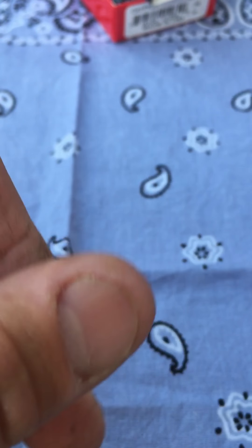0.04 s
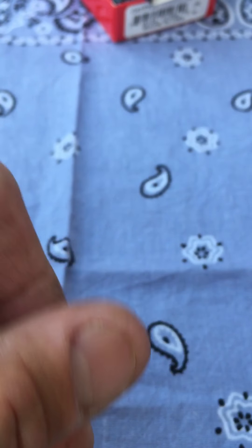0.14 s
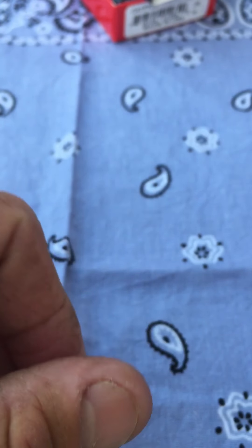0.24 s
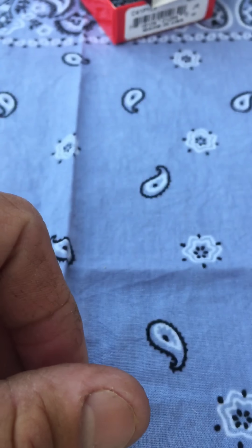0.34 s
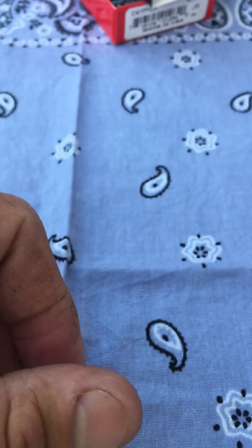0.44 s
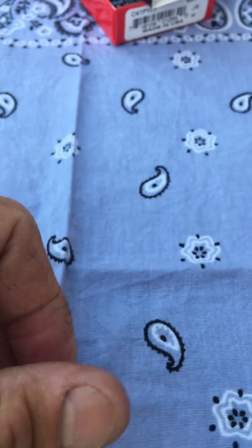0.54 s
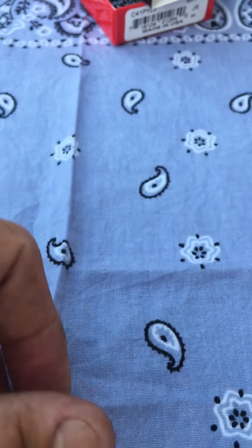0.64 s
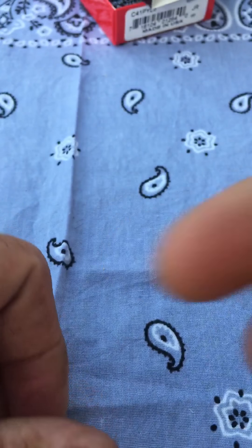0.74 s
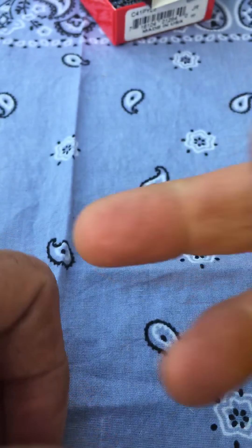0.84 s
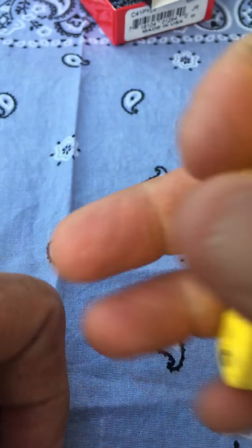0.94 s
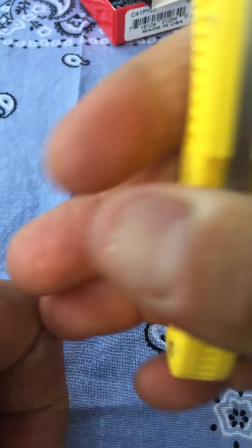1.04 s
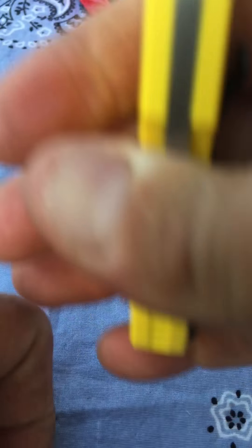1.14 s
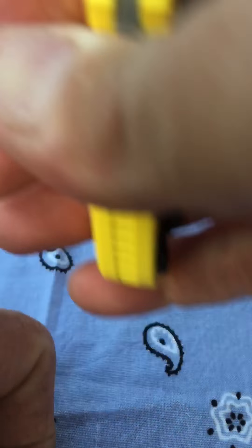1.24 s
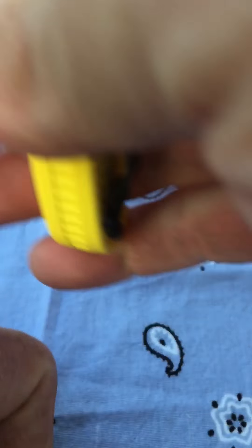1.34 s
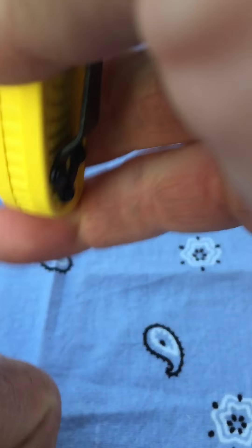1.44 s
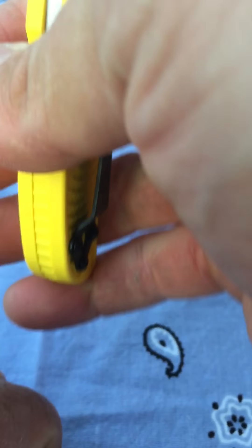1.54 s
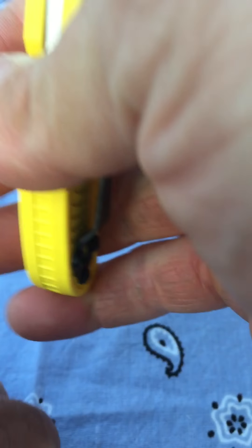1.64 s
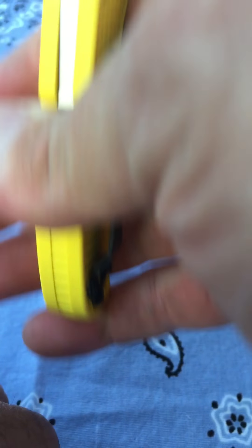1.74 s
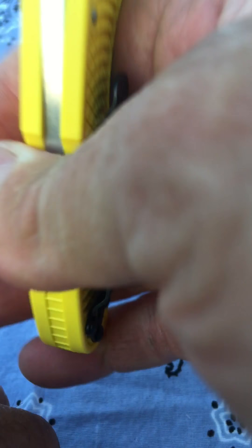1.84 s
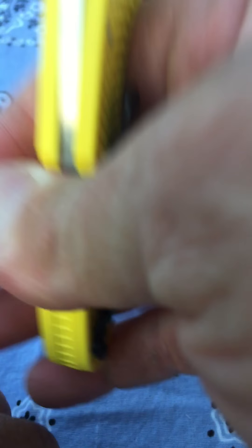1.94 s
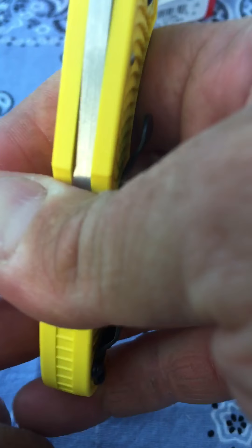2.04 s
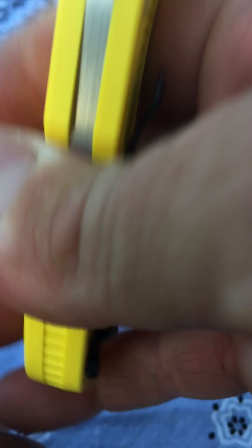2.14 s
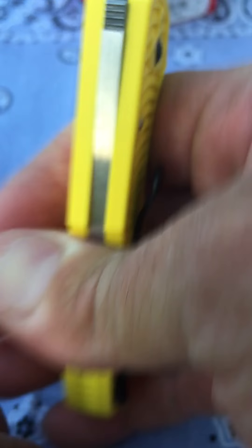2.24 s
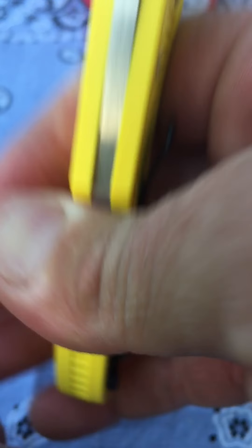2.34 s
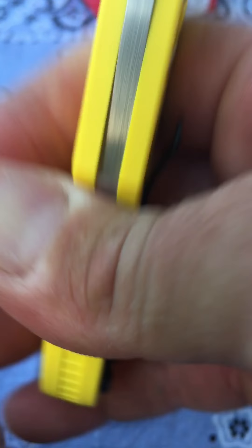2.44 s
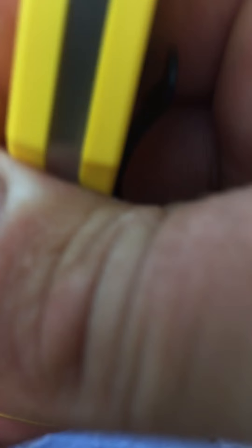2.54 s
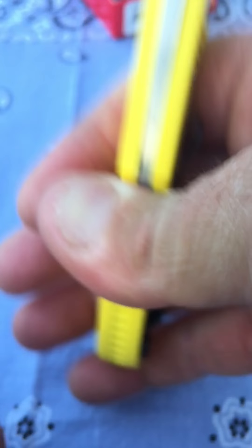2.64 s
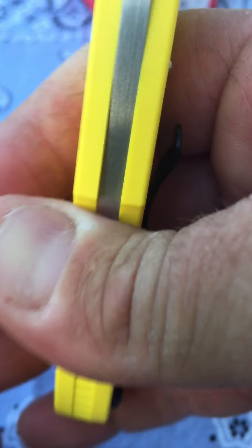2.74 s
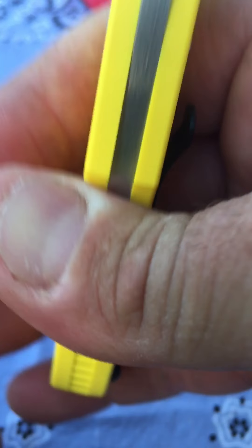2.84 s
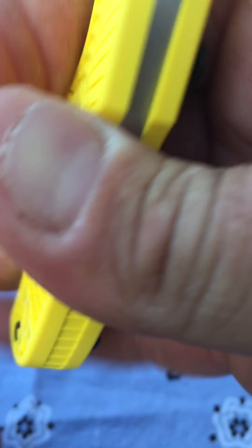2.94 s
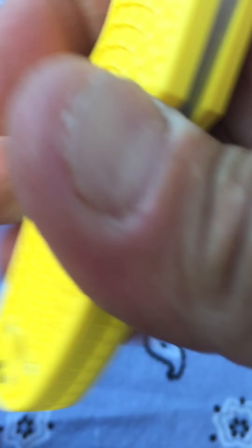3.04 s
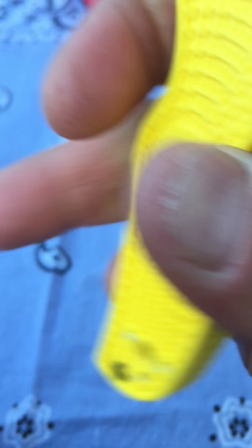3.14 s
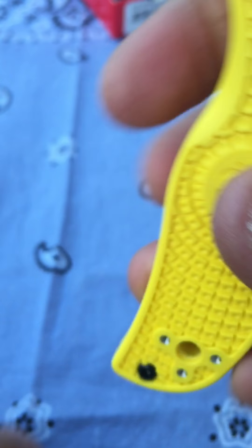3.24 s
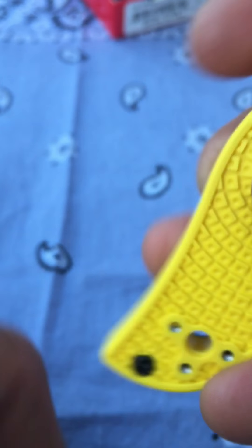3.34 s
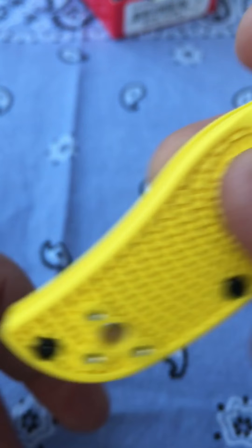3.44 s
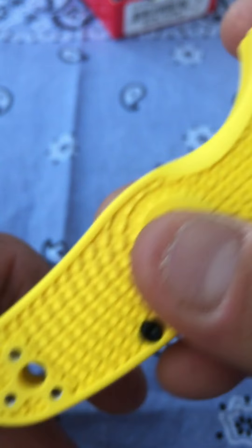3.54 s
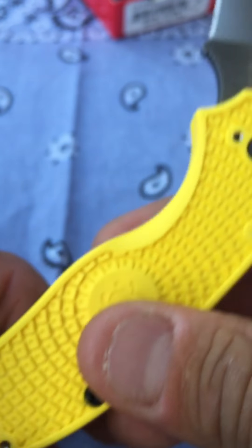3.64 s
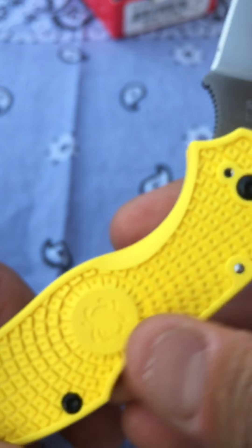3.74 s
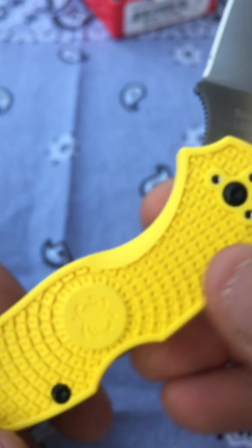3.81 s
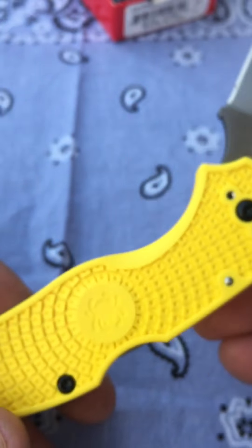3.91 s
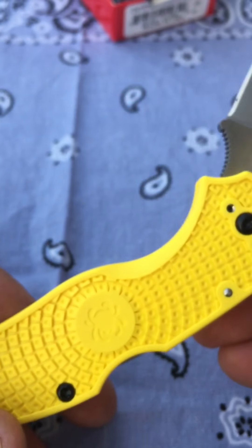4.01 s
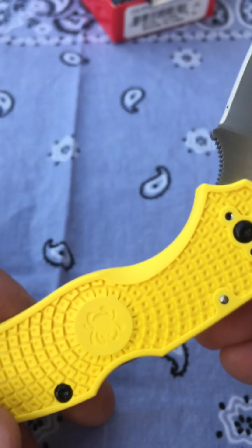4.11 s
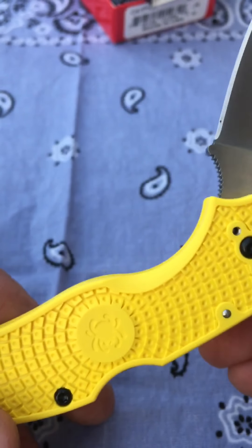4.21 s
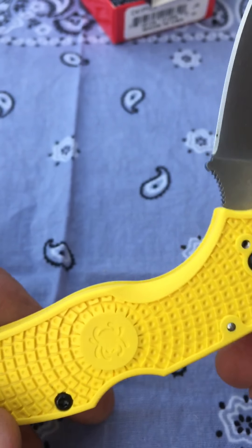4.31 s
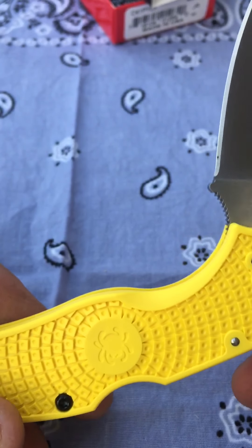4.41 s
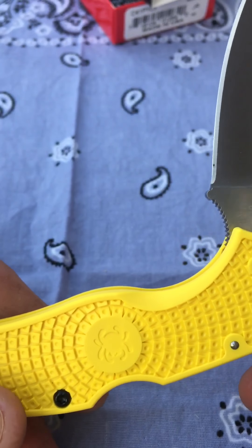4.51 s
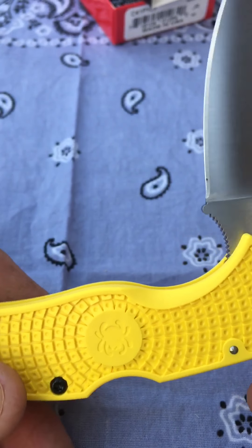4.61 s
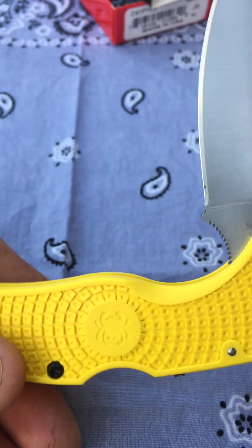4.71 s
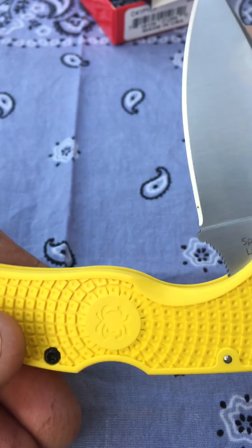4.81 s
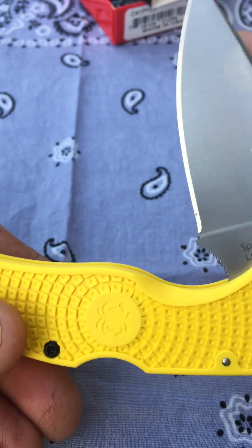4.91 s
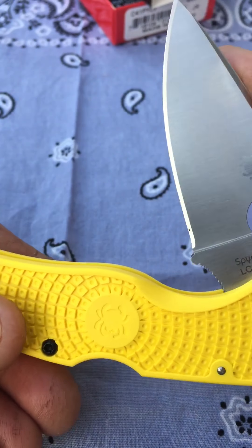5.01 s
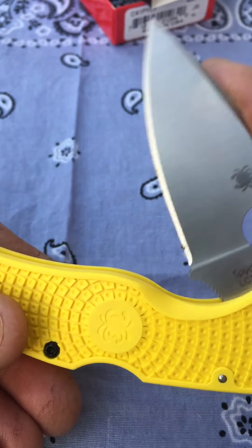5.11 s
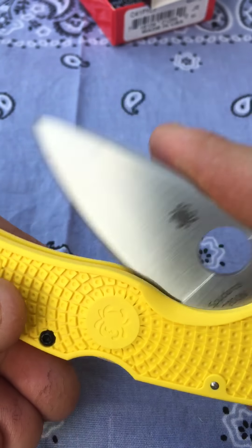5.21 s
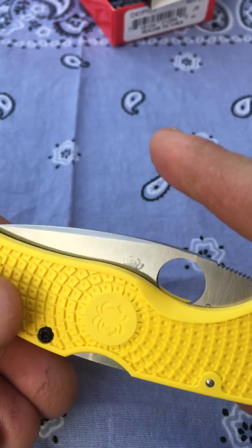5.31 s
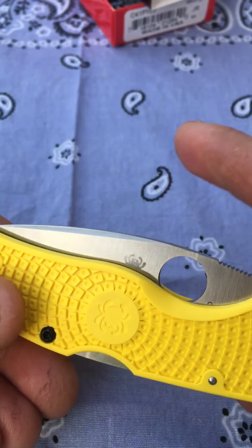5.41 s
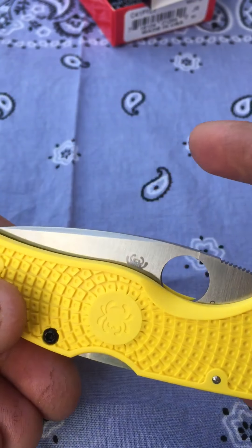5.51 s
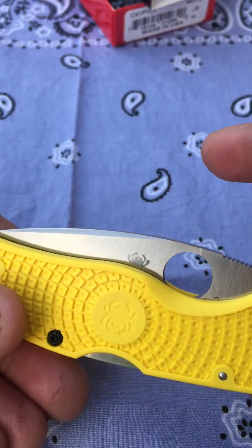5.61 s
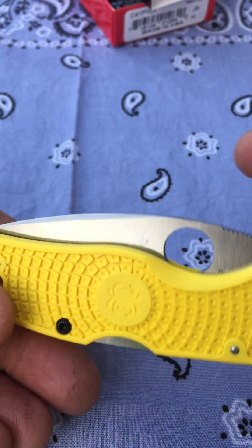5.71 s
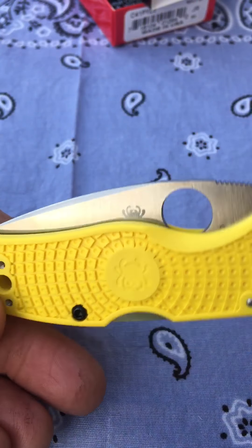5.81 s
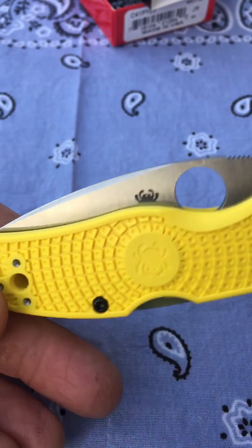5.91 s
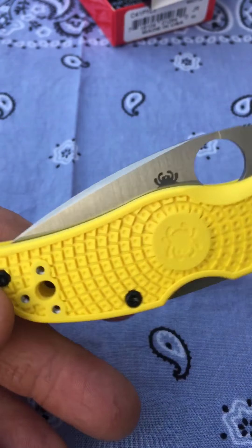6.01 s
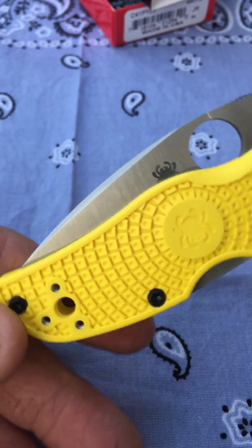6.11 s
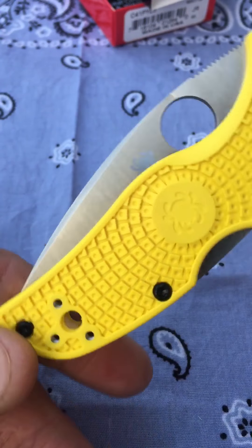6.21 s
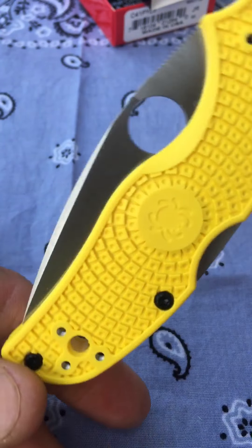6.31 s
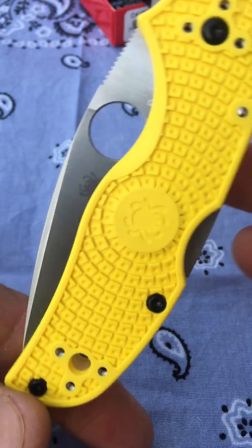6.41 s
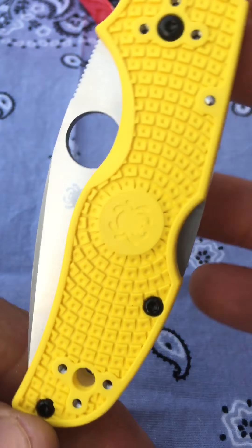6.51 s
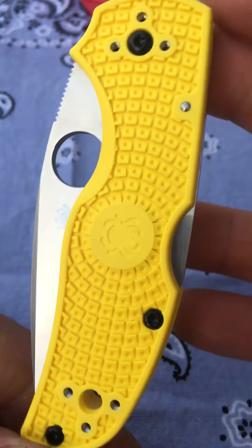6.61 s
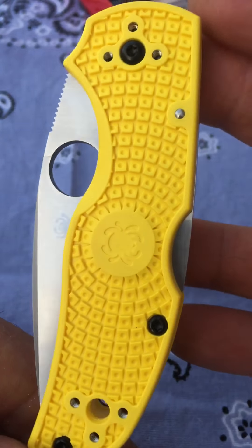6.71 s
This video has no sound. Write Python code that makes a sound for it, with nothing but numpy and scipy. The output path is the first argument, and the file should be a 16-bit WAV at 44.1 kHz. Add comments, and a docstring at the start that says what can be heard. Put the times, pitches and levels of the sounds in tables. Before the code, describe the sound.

Close, dry clicks and skin rubbing on textured plastic lead to one loud, distorted metallic snap of a folding blade, with low road rumble behind.

```python
"""Distant traffic rumbles outside a small room; a plastic-handled folding knife is soon turned over in
the hand, close to the microphone. Fingers rub and scrape its textured grip, it ticks lightly, the lock
gives with a dull bump, and the blade snaps shut, hard enough to overload the input.
Traffic is shaped noise, an engine and a hum are wavering tones; friction is noise with tiny slips,
squeaks are hoarse tones, and contacts ring decaying modes with a short noisy crack."""
import sys
import numpy as np
from scipy import signal
from scipy.fft import rfft, irfft, next_fast_len
from scipy.io import wavfile
from scipy.ndimage import uniform_filter1d, map_coordinates

SR = 44100
rng = np.random.default_rng(int(sys.argv[2]) if len(sys.argv) > 2 else 0)


def master_out(mix):
    """Clip the mix to full scale and print it as 16-bit PCM to the path in sys.argv[1]."""
    frames = np.transpose(np.atleast_2d(mix))
    ceiling = np.clip(frames, -1, 1)
    pcm = np.round(ceiling * 32767).astype(np.int16)
    wavfile.write(sys.argv[1], SR, pcm)


N = 297763  # length in samples


def amp(db):
    """Decibels to gain."""
    return 10 ** (np.asarray(db) / 20)


def unit(x):
    """Scaled to rms 1."""
    return x / np.sqrt(np.mean(x ** 2) + 1e-20)


def along(points, hz):
    """Interpolate (Hz, value) points on a log frequency axis."""
    f, v = np.transpose(points)
    return np.interp(np.log(hz + 1), np.log(f + 1), v)


def curves(rows):
    """One value per sample for each column after the time."""
    s, *cols = np.transpose(rows)
    return [np.interp(np.arange(N) / SR, s, c) for c in cols]


def wobble(rate):
    """A smooth random curve with rate knots a second."""
    knots = rng.standard_normal(int(N * rate / SR) + 4)
    return map_coordinates(knots, [np.arange(N) * rate / SR])


def filtered(x, response):
    """x times a response of frequency."""
    size = next_fast_len(len(x) + 8192)
    hz = np.fft.rfftfreq(size, 1 / SR)
    return irfft(rfft(x, size) * response(hz), size)[:len(x)]


def noise(spectrum):
    """Coloured noise of rms 1."""
    return unit(filtered(rng.standard_normal(N), lambda hz: amp(along(spectrum, hz))))


def bell(hz, centre_hz, octaves):
    """A broad emphasis around one frequency."""
    return np.exp(-.5 * (np.log2((hz + 1) / centre_hz) / octaves) ** 2)


def hollow(hz, hollow_hz, boost_db):
    """The air cupped between the fingers lifts one narrow band."""
    return amp(boost_db * bell(hz, hollow_hz, octaves=.13))


def swell(t, length, attack, release):
    """Gain that rises to 1 at t = 0, holds for a length and dies away; attack and release are s per 20 dB."""
    return 10 ** (np.minimum(t, 0) / attack - np.maximum(t - length, 0) / release)


def patchy(x, depth_db):
    """Random patches of colour, a few hundred Hz wide, that come and go within some 50 ms."""
    z = signal.stft(x, nperseg=512)[2]
    field = rng.standard_normal(z.shape)
    for _ in range(2):
        field = uniform_filter1d(field, size=4, axis=0)
        field = uniform_filter1d(field, size=9, axis=1)
    patches = unit(amp(depth_db * unit(field)))
    return signal.istft(z * patches, nperseg=512)[1][:len(x)]


def add(track, s, sound):
    """Mix a sound in from time s."""
    start = round(s * SR)
    skip = max(-start, 0)
    part = track[start + skip:start + len(sound)]
    part += sound[skip:skip + len(part)]


def ring(modes, attack=.00008):
    """Struck modes, a little different at each blow; neighbours swing in opposite directions."""
    t = np.arange(SR // 6) / SR
    hz, db, t60 = np.transpose(modes)[:, :, None]
    sign = (-1) ** np.arange(len(db))[:, None]
    gain = amp(db + .5 * rng.standard_normal(db.shape)) * sign
    waves = np.sin(2 * np.pi * hz * t) * amp(-60 * t / t60) * (1 - np.exp(-t / attack))
    return (gain * waves).sum(0) / np.linalg.norm(gain)


def crack(t60, centre_hz, octaves):
    """The short noisy burst of a hard contact."""
    t = np.arange(SR // 6) / SR
    burst = filtered(rng.standard_normal(len(t)), lambda hz: bell(hz, centre_hz, octaves))
    return unit(burst) * amp(-60 * t / t60)


# Colour of the steady hiss. Each row: frequency in Hz, relative level in dB.
HISS_COLOUR = [(1000, 2), (5000, -3), (6500, -7), (9300, -9), (10300, -12), (11500, -14.5), (15500, -12),
               (16200, -17.5)]


def hiss():
    """A faint, steady, broad noise under everything."""
    return amp(-72.0) * noise(HISS_COLOUR)


# The road outside. Each row: time in seconds, then rumble, drone and tyre wash, each in dB
# before the lift of its layer.
TRAFFIC = [(0.0, -43, -49.5, -46.5), (0.3, -42.5, -50, -47.5), (0.86, -43.5, -49, -51),
           (1.22, -40, -45.5, -52.5), (2.24, -44, -49.5, -54), (2.61, -39.5, -49.5, -54.5),
           (2.93, -47.5, -50.5, -51.5), (3.48, -36.5, -46.5, -53), (4.14, -43.5, -45.5, -55),
           (4.87, -42, -47, -49), (5.53, -46.5, -48.5, -49), (5.75, -47, -43.5, -49),
           (6.17, -44.5, -43, -47.5), (6.75, -38.5, -43.5, -49)]
# Colours of the three layers. Each row: frequency in Hz, relative level in dB.
RUMBLE_COLOUR = [(20, -41), (34, -25.5), (42, 3), (50, 17.5), (62, 13.5), (80, 9.5), (110, -1),
                 (200, -52.5)]
DRONE_COLOUR = [(60, -18), (95, 0.5), (128, 0), (180, -4.5), (250, -8), (350, -10.5), (440, -13),
                (700, -37), (1500, -83)]
WASH_COLOUR = [(150, -22.5), (350, -6), (500, -1.5), (630, 4), (820, -3), (1030, 2.5), (1280, -6.5),
               (1800, -7.5), (2400, -16.5), (3200, -26.5), (5000, -43), (9000, -78)]
RUMBLE_LIFT_DB, DRONE_LIFT_DB = 0.5, 3


def traffic():
    """Rumble, drone and tyre wash of a distant road, dulled by the walls."""
    rumble_db, drone_db, wash_db = curves(TRAFFIC)
    rumble = amp(rumble_db + RUMBLE_LIFT_DB) * noise(RUMBLE_COLOUR)
    drone = amp(drone_db + DRONE_LIFT_DB + 2.1 * wobble(9)) * noise(DRONE_COLOUR)
    wash = amp(wash_db) * unit(patchy(noise(WASH_COLOUR), depth_db=1.6))
    return rumble + drone + wash


# A far engine pulls away. Each row: start in seconds, length in seconds, level in dB.
PULLS = [(3.343, .29, -43.5), (5.579, .42, -39.5)]
# Its orders. Each row: multiple of the firing rate, relative level in dB.
EXHAUST_ORDERS = [(2, -2), (3, -6.5), (4, -5), (5, -1.5)]
# Colour of its roar. Each row: frequency in Hz, relative level in dB.
ROAR_COLOUR = [(120, -25.5), (240, 7), (300, 13), (380, 9), (450, -17), (700, -50)]
PULL_ATTACK_S, PULL_RELEASE_S = 0.31, 0.9  # time to move 20 dB
LOW_FIRING_HZ, HIGH_FIRING_HZ = 67.5, 71  # at the start and the end of a pull
LOAD_RUMBLE_DB = -0.5  # rumble under load, against the orders and roar together


def engine(flutter_db=6.5, roar_db=-2):
    """One far engine speeds up through each pull, its orders fading in and out of its roar and rumble."""
    out = np.zeros(N)
    for s, length, db in PULLS:
        t = np.arange(N) / SR - s
        firing_hz = np.interp(t, [0, length], [LOW_FIRING_HZ, HIGH_FIRING_HZ])
        turns = np.cumsum(firing_hz * (1 + 0.0051 * wobble(13))) / SR
        orders = np.zeros(N)
        for multiple, level in EXHAUST_ORDERS:
            orders += amp(level + flutter_db * wobble(12)) * np.sin(2 * np.pi * multiple * turns)
        exhaust = unit(unit(orders) + amp(roar_db) * noise(ROAR_COLOUR))
        sound = exhaust + amp(LOAD_RUMBLE_DB) * noise(RUMBLE_COLOUR)
        out += amp(db) * sound * swell(t, length, PULL_ATTACK_S, PULL_RELEASE_S)
    return out


BOOM_S, BOOM_LENGTH_S, BOOM_DB = 5.87, 0.55, -41  # the swell of the hum
BOOM_EDGE_S = .3  # time to move 20 dB


def hum(hum_hz=127, waver=0.01, rest_db=-55, flutter_db=4):
    """A low hum wavers under the traffic and swells once."""
    tone = np.sin(2 * np.pi * np.cumsum(hum_hz * (1 + waver * wobble(8.1))) / SR)
    t = np.arange(N) / SR - BOOM_S
    boom = amp(BOOM_DB) * swell(t, BOOM_LENGTH_S, BOOM_EDGE_S, BOOM_EDGE_S)
    return (amp(rest_db) + boom) * unit(tone * amp(flutter_db * wobble(12.0)))


# Decay of the small room. Each row: frequency in Hz, time to fall 60 dB in seconds.
ROOM_DECAY = [(300, 0.16), (3000, 0.22), (4300, 0.22), (6000, 0.15), (10000, 0.21), (16000, .17)]


def room(x):
    """The room's answer: a decaying noise tail, delayed by 6.9 ms, tilted towards the bass."""
    hz, t, z = signal.stft(rng.standard_normal(SR // 2), SR, nperseg=256)
    tilt = [(300, 11.5), (3200, 0.5), (5000, -2.0), (9000, -5.0), (16000, -9.5)]  # (Hz, dB)
    colour = amp(along(tilt, hz))[:, None]
    decay = amp(-60 * t / along(ROOM_DECAY, hz)[:, None])
    tail = signal.istft(z * colour * decay, SR, nperseg=256)[1]
    answer = np.pad(tail / np.linalg.norm(tail), (round(0.0069 * SR), 0))
    return signal.fftconvolve(x, answer)[:N]


# Finger strokes, close to the microphone. Each row: start in seconds, length in seconds, level at the
# start in dB, change from start to end in dB, centre of the colour in Hz, width of the colour in
# octaves, hollow of the hand in Hz, lift of that hollow in dB.
STROKES = [(0.03, 0.24, -69.5, 6, 6000, .9, 4500, 0), (.157, .018, -66, 0, 11000, .9, 12000, 2),
           (0.291, 0.017, -55, -5, 5370, .9, 4700, 3), (.395, .03, -64, 0, 3700, .9, 3100, 3),
           (.475, .02, -67, 0, 4500, .9, 2800, 2), (.527, .022, -62, 0, 6000, .9, 4500, 6),
           (0.612, 0.03, -56, 3, 3300, 1.1, 3300, 6), (.66, .05, -61, 0, 5500, 1, 5700, 3),
           (0.737, 0.03, -48, -3, 2300, 1.3, 3900, 5), (.742, .022, -61, 0, 8000, .5, 7700, 4),
           (.78, .04, -63, -4, 3300, .9, 2400, 0), (.9, .05, -64, 0, 7500, .9, 7000, 3),
           (1.004, 0.045, -54, -1, 3700, 1, 8900, 9), (1.06, .03, -52, 3, 3700, .85, 5100, 9),
           (1.097, 0.018, -42.5, 0, 3700, .85, 5200, 7), (1.136, .035, -49.5, -2, 3000, .9, 5000, 10),
           (1.2, .045, -55, 5, 3800, 1.2, 5500, 2), (1.506, 0.12, -65.5, 6, 4940, .9, 6000, 0),
           (2.318, 0.006, -52, -2, 7300, .7, 4400, 5), (2.365, 0.042, -68, 4, 11000, .9, 6400, 3),
           (2.782, 0.06, -59, -5, 4230, .9, 4000, 0), (3.053, .016, -55, 0, 7000, 1.5, 4600, 4),
           (3.082, 0.03, -51, 2, 5500, .95, 6900, 7), (3.535, 0.045, -56.5, 2, 5700, .9, 3900, 7),
           (4.13, .03, -65, 0, 3500, .9, 3500, 0), (4.35, .55, -67.5, 2, 4200, .85, 5100, 4),
           (5.21, .16, -64.5, 5, 4800, .9, 4100, 6), (5.594, 0.03, -65, -4, 8000, .9, 5600, 3),
           (6.063, .02, -71, 0, 11000, .5, 9800, 3), (6.188, .016, -70, 0, 9000, .5, 9300, 3),
           (6.3, .3, -62.5, 0, 3500, .8, 4300, 3)]
# Colour of skin on the grip. Each row: frequency in Hz, relative level in dB.
GRIP_COLOUR = [(1200, -38.5), (1800, 7), (2450, 13), (3000, 5.5), (3600, -2), (4050, -0.5), (4600, -5.5),
               (5600, -4), (7100, -5), (8200, -11.5), (9400, -6), (10400, -18), (12300, -6.5),
               (16000, -13.5)]
# time to move 20 dB, as a share of the stroke: a longer one takes hold and lets go more slowly
STROKE_ATTACK_SHARE, STROKE_RELEASE_SHARE = 1, 0.98
UNEVEN_DB, CATCHES_PER_S = 2.5, 180  # random unevenness of the friction
EVEN_STROKE_S = .15  # a stroke this long has half the unevenness


def rubbing(slips_per_s=900, slip_share=0.46):
    """Skin slides over the grip: hiss with tiny slips, coloured by the hand; slow strokes run more evenly."""
    out = np.zeros(N)
    t = np.arange(-SR // 4, 3 * SR // 2) / SR
    for s, length, db, change_db, centre_hz, octaves, hollow_hz, hollow_db in STROKES:
        slipping = rng.random(len(t)) < slips_per_s / SR
        slips = unit(rng.standard_normal(len(t)).clip(-2, 2) * slipping)
        smooth = rng.standard_normal(len(t))
        friction = np.sqrt(slip_share) * slips + np.sqrt(1 - slip_share) * smooth

        def colour(hz):
            grip = amp(along(GRIP_COLOUR, hz))
            return grip * bell(hz, centre_hz, octaves) * hollow(hz, hollow_hz, hollow_db)

        rub = unit(filtered(friction, colour))
        contact = swell(t, length, STROKE_ATTACK_SHARE * length, STROKE_RELEASE_SHARE * length)
        depth_db = UNEVEN_DB / (1 + (length / EVEN_STROKE_S) ** 2)
        uneven_db = depth_db * wobble(CATCHES_PER_S)[:len(t)]
        pressure = amp(change_db * np.clip(t / length, 0, 1) + uneven_db)
        add(out, s + t[0], amp(db) * rub * contact * pressure)
    return patchy(out, depth_db=2.5)


# The ridged grip drags over the skin. Each row: start in seconds, length in seconds, level at the end
# in dB, change from start to end in dB, centre of the colour in Hz, hollow of the hand in Hz, lift of
# that hollow in dB.
SCRAPES = [(3.147, 0.048, -62.5, -2.5, 5300, 5700, 4), (3.236, 0.033, -46, 4.5, 5840, 3650, 5),
           (3.277, 0.049, -54, -3.5, 4070, 8450, 4), (3.341, 0.028, -46.5, 7, 3900, 9300, 11),
           (3.378, 0.012, -55, -1, 5200, 2960, 21), (3.412, .03, -68, 1, 5500, 5600, 0),
           (3.456, 0.027, -54, 2.5, 5770, 7840, 0), (3.5, 0.017, -46, 5, 5330, 6700, 0),
           (3.593, 0.039, -67.5, -2, 7500, 9800, -0.5), (3.723, 0.027, -70, 2, 6000, 6000, 2),
           (3.804, 0.024, -74, -1, 7500, 7500, 4), (3.871, 0.11, -64, 2.5, 5870, 4500, 8)]
# Resonances of the handle and cupped hand under a scrape. Each row: frequency in Hz before the shift
# of each hold, width in Hz, relative level in dB.
SCRAPE_BODY = [(2600, 200, 5), (3570, 230, 5), (4550, 300, -1), (5900, 700, -4.5), (6950, 800, -4.5),
               (8100, 900, -10), (9200, 700, -4), (11900, 1200, -14), (14000, 1800, -14)]
RIDGES_PER_S, RIDGE_SCATTER_DB, SCRAPE_HISS_DB = 1100, 4, -3
SCRAPE_ATTACK_S, SCRAPE_RELEASE_S = 0.026, 0.02  # time to move 20 dB


def scrapes(octaves=0.74, shift=0.021):
    """Ridges flick past the skin and ring the handle, whose resonances shift a little with each hold."""
    out = np.zeros(N)
    t = np.arange(-SR // 8, SR // 4) / SR
    for s, length, db, change_db, centre_hz, hollow_hz, hollow_db in SCRAPES:
        flicks = rng.random(len(t)) < RIDGES_PER_S / SR
        ridges = flicks * amp(RIDGE_SCATTER_DB * rng.standard_normal(len(t)).clip(-2, 2))
        friction = unit(ridges) + amp(SCRAPE_HISS_DB) * rng.standard_normal(len(t))
        tuning = 1 + shift * rng.standard_normal(len(SCRAPE_BODY))

        def colour(f):
            body = 0
            for (hz, width, level), tune in zip(SCRAPE_BODY, tuning):
                damping = 1j * f * width
                body = body + amp(level) * damping / ((hz * tune) ** 2 - f * f + damping)
            return body * bell(f, centre_hz, octaves) * hollow(f, hollow_hz, hollow_db)

        grit = unit(filtered(friction, colour))
        pressure = amp(change_db * (np.clip(t / length, 0, 1) - 1.0))
        contact = swell(t, length, SCRAPE_ATTACK_S, SCRAPE_RELEASE_S)
        add(out, s + t[0], amp(db) * grit * pressure * contact)
    return patchy(out * amp(UNEVEN_DB * wobble(CATCHES_PER_S)), depth_db=3.2)


# Skin catches on the plastic. Each row: middle in seconds, half length in seconds, level in dB, pitch
# in Hz, fall of the pitch half a length away in octaves, pitch scatter as a share.
SQUEAKS = [(0.295, 0.0026, -40.5, 2215, 0.0015, 0.042), (0.297, 0.0079, -61, 4050, 0.01, 0.02),
           (0.931, 0.023, -68, 6900, 0.039, 0.027), (1.19, .05, -59, 2230, 0.029, 0.057),
           (2.964, 0.025, -56.5, 3950, 0.12, 0.031), (3.956, 0.02, -59, 4540, 0.012, 0.03),
           (4.45, 0.063, -78, 5050, 0, 0.019), (4.7, .025, -77, 5060, 0.018, .02),
           (4.991, 0.0027, -53.5, 3765, 0.018, .07), (5.051, 0.0065, -56.5, 3850, 0.0049, .07),
           (5.066, 0.0048, -58, 3700, 0.027, 0.063), (5.19, 0.022, -74, 6300, 0, .015),
           (5.252, 0.029, -67, 5200, 0, 0.017)]


def squeaks():
    """Fast uneven stick-slip makes a brief, hoarse tone that rises and falls with the finger's speed."""
    out = np.zeros(N)
    t = np.arange(-SR // 4, SR // 4) / SR

    def unevenness():
        return unit(filtered(rng.standard_normal(len(t)), lambda f: 1 / (1 + (f / 500) ** 4)))

    for s, half, db, hz, arch, scatter in SQUEAKS:
        pitch = hz * 2 ** (-arch * (t / half) ** 2) * (1 + scatter * unevenness())
        turns = np.cumsum(pitch) / SR
        tone = unit(np.sin(2 * np.pi * turns) * amp(4.5 * unevenness()))
        add(out, s + t[0], amp(db) * tone * np.exp(-(t / half) ** 2))
    return out


# Soft bumps of the hand. Each row: middle in seconds, level in dB, frequency in Hz, time from the
# middle to a fall to 1/e in seconds.
BUMPS = [(2.7689, -16, 143, 0.0049), (2.776, -21.5, 84.4, 0.013), (2.7845, -26, 221, 0.0049),
         (2.793, -26, 79.6, 0.023), (2.804, -31.5, 1000, 0.0016)]


def bumps():
    """The lock gives under the thumb and the hand jolts: a few low swings, each with a dull scuff."""
    out = np.zeros(N)
    t = np.arange(-SR // 20, SR // 20) / SR
    for s, db, hz, length in BUMPS:
        add(out, s + t[0], amp(db) * np.sin(2 * np.pi * hz * t) * np.exp(-(t / length) ** 2))
        add(out, s, amp(-44.0) * crack(t60=0.2, centre_hz=362, octaves=0.96))
    return out


# Light contacts on the handle. Each row: time in seconds, level in dB, centre of the colour in Hz,
# width of the colour in octaves, ring length as a share of the usual, hollow of the hand in Hz.
CLICKS = [(0.2204, -13, 8300, 1.5, 0.6, 7740), (0.735, -47, 2400, 0.34, 1.2, 2250),
          (1.002, -32.5, 2600, 1.07, 2.2, 2770), (1.096, -22, 2600, 0.5, 0.63, 2400),
          (1.102, -18, 2780, 0.51, 1.1, 2500), (1.107, -11, 2950, 0.58, 0.51, 2540),
          (1.149, -33, 2300, .4, 1.2, 2300), (1.168, -28.5, 2300, 0.38, 0.86, 2250),
          (1.2432, -10, 3150, 0.94, 1.03, 3560), (1.3182, -37, 3980, 0.18, 1.5, 4000),
          (1.5527, -6, 3950, 0.75, 0.83, 6950), (2.316, -27, 7500, 0.45, 0.66, 4370),
          (2.7741, -21, 6450, 3.1, 1.06, 4200), (2.794, -33.5, 5500, 0.8, 1.4, 5570),
          (2.804, -37, 3200, .9, 1.2, 4000), (3.04, -32.5, 2100, 0.31, 1.2, 2090),
          (3.056, -33, 2600, 0.92, 1.4, 4570), (3.272, -24, 6260, 0.9, 0.94, 3700),
          (3.392, -38, 3200, 0.69, 1.2, 2640), (3.518, -47, 6500, 0.93, 1.4, 6600),
          (5.584, -37.5, 8900, 0.42, 0.91, 9100), (5.594, -42, 8900, .45, 0.91, 7400)]
# The handle, damped by the fingers. Each row: frequency in Hz, relative level in dB before the colour
# of the contact, usual time to fall 60 dB in seconds.
HANDLE_MODES = [(2130, 6.5, 0.0074), (2430, 1, 0.011), (3300, 7, 0.00085), (4960, -2, 0.0042),
                (5990, -6.5, 0.012), (7560, -6.5, 0.0026), (8110, -1.5, 0.0086), (8500, 14.5, 0.00097),
                (8640, 8, 0.0048), (12100, 5, 0.0044), (14500, 4, 0.0044)]
HOLLOW_DB, HOLLOW_T60_S = -1, 0.0048  # air between the fingers; its ring scales with the contact's


def clicks(lowest_hz=1950, rise_cycles=0.97):
    """Each contact favours some handle modes and rings the hollow of the hand; low modes swell more slowly."""
    out = np.zeros(N)
    rise_s = rise_cycles / np.array(HANDLE_MODES)[:, :1]
    for s, db, centre_hz, octaves, ring_share, hollow_hz in CLICKS:
        modes = []
        for hz, level, t60 in HANDLE_MODES:
            colour_db = 20 * np.log10(bell(hz, centre_hz, octaves) + 1e-6)
            modes.append((hz, level + colour_db, t60 * ring_share))
        burst = crack(t60=0.012 * ring_share, centre_hz=centre_hz, octaves=0.61)
        tick = ring(modes, attack=rise_s) + amp(-17.5) * burst
        air = amp(HOLLOW_DB) * ring([(hollow_hz, 0, HOLLOW_T60_S * ring_share)], attack=0.0004)
        add(out, s, amp(db) * (tick + air))
    # so small a body radiates no bass
    return signal.sosfilt(signal.butter(10, lowest_hz, "highpass", fs=SR, output="sos"), out)


# Faint after-ring of the steel. Each row: frequency in Hz, level in dB, time to fall 60 dB in seconds.
STEEL_MODES = [(3130, -46, .18), (4330, -60, .6), (6100, -60, .32), (7750, -63, .18)]


def steel():
    """The steel rings on faintly, each mode a blurred cluster that dies at its own speed."""
    out = np.zeros(N)
    t = np.arange(SR // 2) / SR
    for hz, db, t60 in STEEL_MODES:
        cluster = unit(filtered(rng.standard_normal(len(t)), lambda f: bell(f, hz, .035)))
        add(out, SNAP[0][0], cluster * amp(db - 60 * t / t60))
    return out


# The snap as it spreads into the room in all directions. Each row: frequency in Hz, level in dB.
SNAP_SPREAD = [(500, 5), (2500, 14), (3300, 22.5), (4500, 19.5), (6000, 20.5), (7000, 11), (9000, 14.5),
               (10500, 10), (11500, 14), (13500, 9), (15000, 11)]


def snap_spread():
    """What the walls get of the snap: one sharp pulse, its colour evened out over all directions."""
    pulse = np.zeros(N)
    pulse[round(SNAP[0][0] * SR)] = 1
    return filtered(pulse, lambda hz: amp(along(SNAP_SPREAD, hz)))


# The blade lands, seats and rebounds. Each row: time in seconds, level of the blade in dB, ring of the
# lock bar in dB, ring of the lock spring in dB.
SNAP = [(5.3677, 5, -20, -48), (5.3703, -13, -5, -48), (5.3755, -12, -26, -17.5), (5.3792, -24, -32, -45),
        (5.3945, -40, -50, -56)]
# Blade and frame together, the lock bar, and the lock spring before the blade damps it. Each row:
# frequency in Hz, relative level in dB, time to fall 60 dB in seconds.
BLADE_MODES = [(270, -24, .04), (460, -25, .02), (650, -20.5, .015), (1070, -22, .011), (1450, -19, .009),
               (1860, -16.5, .02), (2600, -17, .011), (3150, -13, .012), (3460, -6, .017), (3740, -7, .018),
               (3950, -8.5, .013), (4380, -5, .009), (4880, 2.5, .007), (5750, -8, .006), (6030, -5, .010),
               (7620, -12, .012), (8920, -8, .011), (9850, -12, .010), (11400, -8, .013),
               (12600, -14, .011), (13150, -13, .011), (14300, -18, .011), (15150, -13, .011)]
LOCK_BAR_MODES = [(3550, -2, 0.0067), (6105, -13, .009), (7180, -15, .012)]
SPRING_MODES = [(1750, -13, .03), (2230, -13, .025), (2560, -3, .018), (2940, 0, .065), (3330, -16, .04),
                (3730, -16, .04), (4330, -6, .022), (4590, -13, .04), (5030, -16, .035), (5570, -12, .03),
                (5950, -13, .04), (8550, -17, .032), (11530, -19, .026)]
# the spring rings freely, then the seated blade damps it (time to fall 20 dB)
SPRING_FREE_S, SPRING_STOP_S = .028, .007


def snap():
    """The blade hits its stop and the lock bar drops; the rebound rings the spring until the blade seats."""
    out, spring = np.zeros(N), np.zeros(N)
    for s, db, bar_db, spring_db in SNAP:
        burst = crack(t60=0.019, centre_hz=5500, octaves=2.1)
        add(out, s, amp(db) * (ring(BLADE_MODES) + amp(-14.5) * burst))
        add(out, s, amp(bar_db) * ring(LOCK_BAR_MODES, attack=0.00037))
        add(spring, s, amp(spring_db) * ring(SPRING_MODES, attack=0.00062))
    t = np.arange(N) / SR - SNAP[0][0]
    damping = swell(t, SPRING_FREE_S, SPRING_STOP_S, SPRING_STOP_S)
    return out + steel() + spring * damping


def scene():
    """The knife close by, the room and the road behind it."""
    background = hiss() + traffic() + engine() + hum()
    handling = rubbing() + scrapes() + squeaks() + bumps() + clicks()
    echo = amp(-24.0) * room(handling + snap_spread())
    return (background + echo + handling + snap())[None]


def record(dry, top_hz=16200):
    """The input clips at full scale; then a steep low-pass removes what lies above the band limit."""
    clipped = np.clip(dry[0], -1, 1)
    return filtered(clipped, lambda hz: 1 / np.sqrt(1 + (hz / top_hz) ** 160))[None]


dry = scene()
out = record(dry)
master_out(out)
```